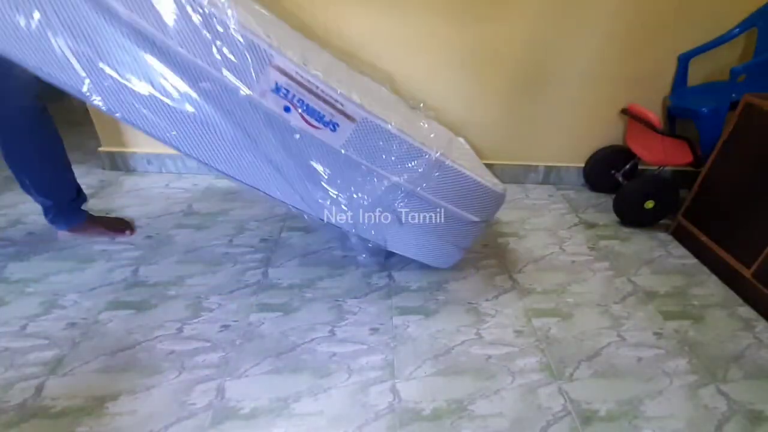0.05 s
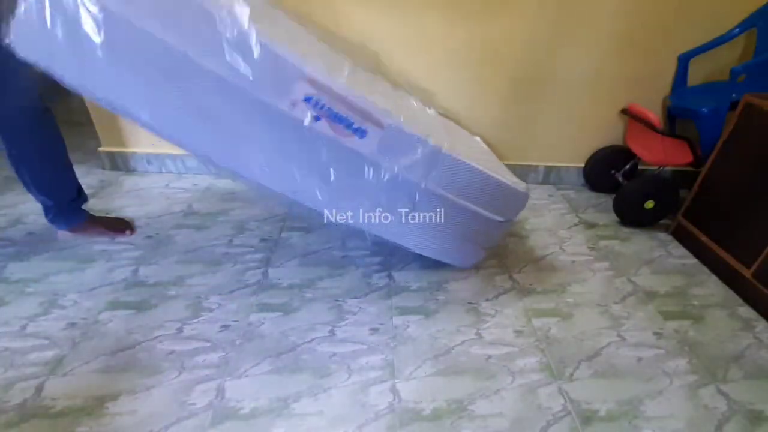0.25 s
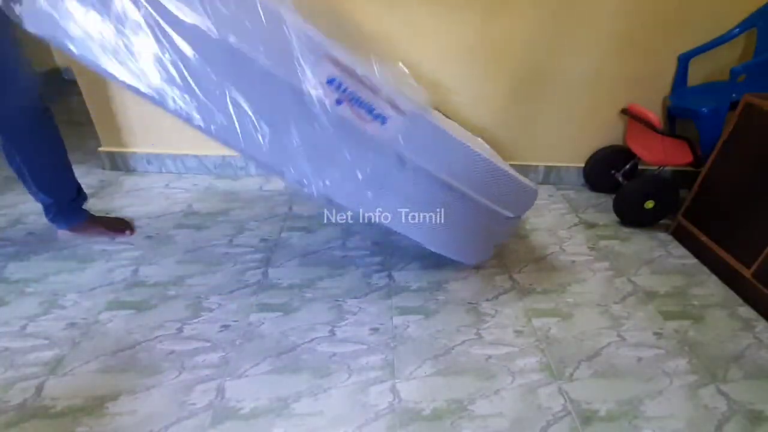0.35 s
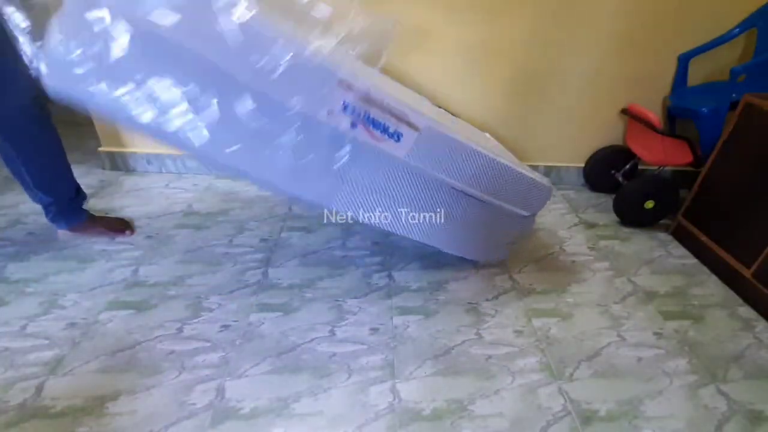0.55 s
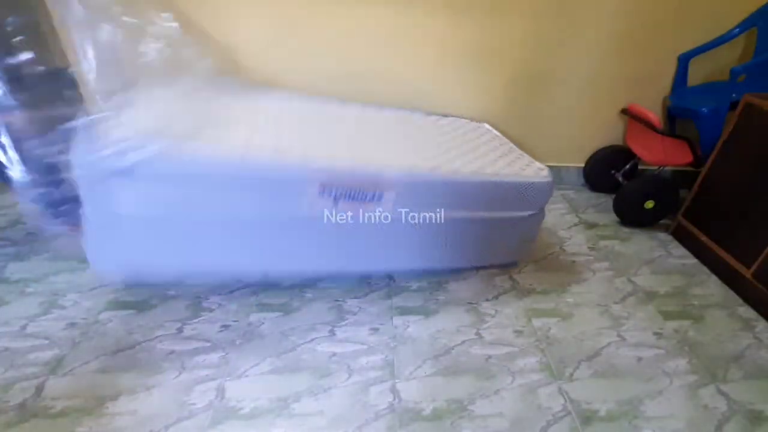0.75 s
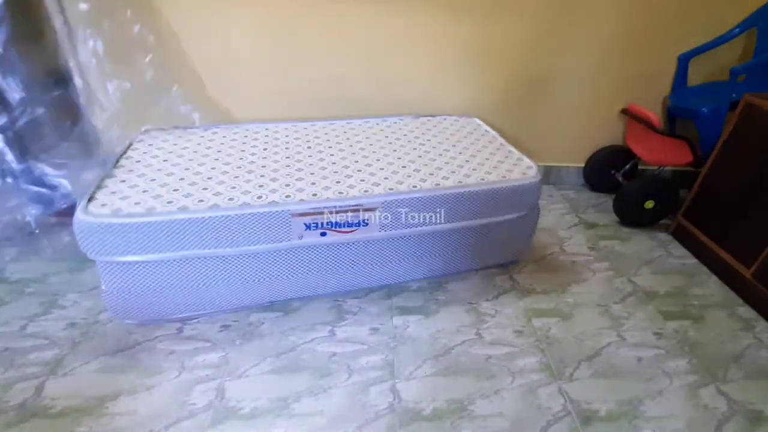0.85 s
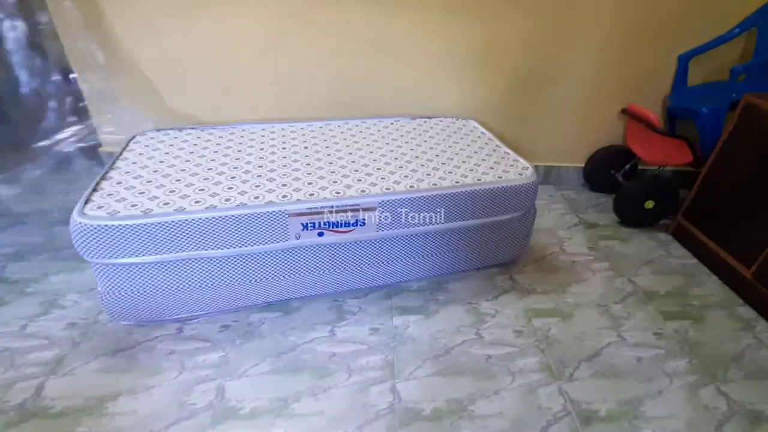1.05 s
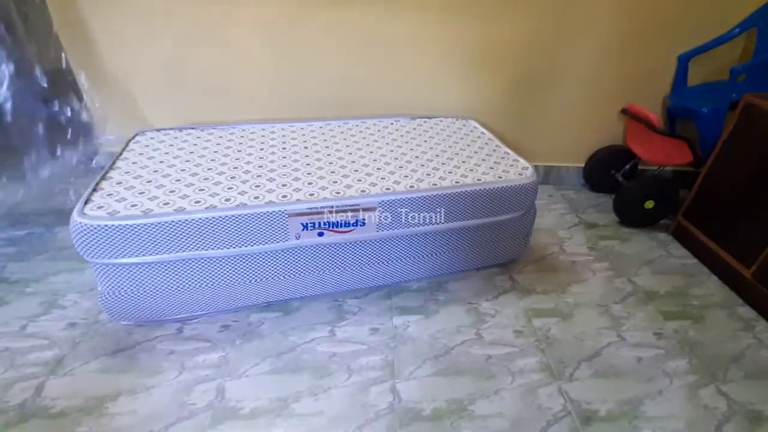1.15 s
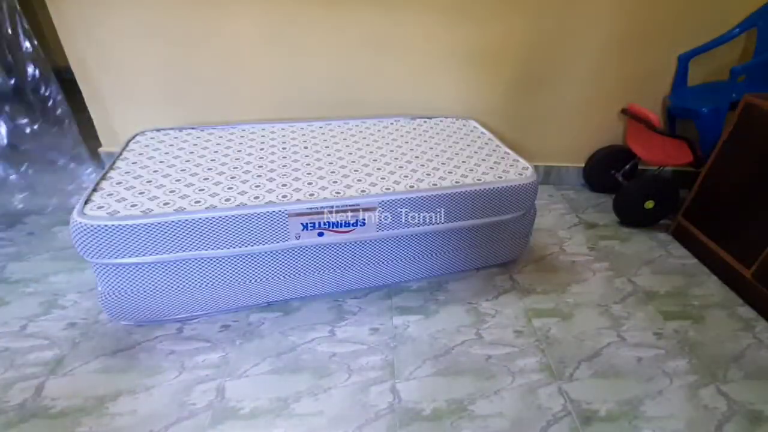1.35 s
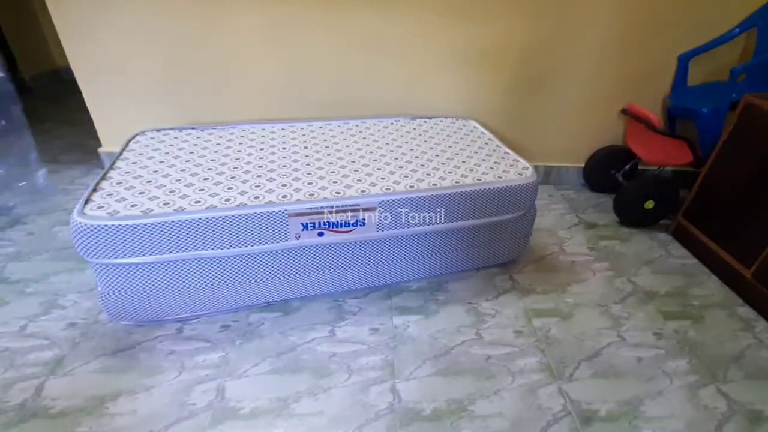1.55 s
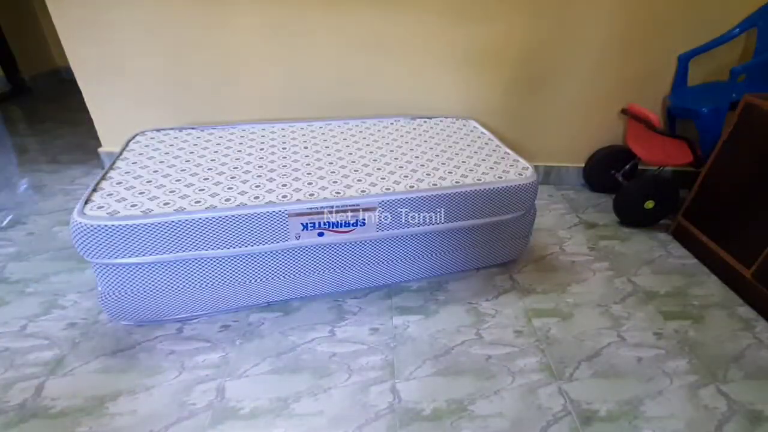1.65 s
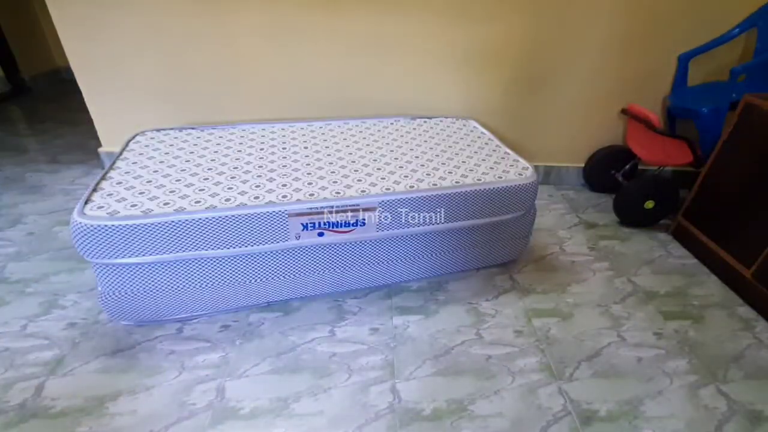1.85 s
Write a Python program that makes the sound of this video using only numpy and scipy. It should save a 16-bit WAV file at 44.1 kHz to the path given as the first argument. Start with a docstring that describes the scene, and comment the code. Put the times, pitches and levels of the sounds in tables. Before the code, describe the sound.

Thin plastic crinkles in uneven tugs from the start, with sharp little snaps, strongest around 0.3 to 0.4 seconds. At about 0.9 seconds a mattress slaps the tiled floor, the loudest moment, its low boom fading in the bare room over half a second. Lighter rustling continues until about 1.7 seconds. Soft microphone rumble and bumps come and go, mostly on the right, over faint background noise.

```python
"""Unwrapping a mattress

Thin plastic is dragged off a tilted mattress in a bare tiled room; its creases buckle and crackle.
The mattress topples and slaps the floor, and the air pulse flutters between floor and ceiling as a low
boom. A hand-held phone rumbles and bumps softly, mostly on the right, over faint background noise."""
import sys
import numpy as np
from scipy import signal
from scipy.fft import rfft, irfft
from scipy.io import wavfile

SR = 44100
rng = np.random.default_rng(int(sys.argv[2]) if len(sys.argv) > 2 else 0)


def int16_out(signal):
    """Quantize to a 16-bit WAV file."""
    q = np.round(np.clip(np.atleast_2d(signal).T, -1, 1) * 32767)
    wavfile.write(sys.argv[1], SR, q.astype(np.int16))


N = 83790
t = np.arange(N) / SR
FILM_T60_S, FILM_BUILD_S, IMPACT_BUILD_S = 0.44, 0.0021, 0.0066  # decay and onset of the reverberation


def undb(db):
    """Amplitude grows tenfold for every 20 dB."""
    return 10 ** (np.asarray(db) / 20)


def unit(x):
    """Normalisation to an rms of 1."""
    return x / np.sqrt(np.mean(x ** 2))


def pan(db):
    """Level difference, left minus right, as a pair of gains."""
    return undb(np.array([[db], [-db]]) / 2)


def decay(age, t60):
    """Exponential damping: 60 dB in t60 seconds."""
    return np.exp(-np.log(1000) * age / t60)


def convolve(x, response):
    """A linear system acts by convolution with its impulse response."""
    return signal.fftconvolve(np.atleast_2d(x), np.atleast_2d(response), axes=-1)[:, :N]


def colour(x, points, size=8192):
    """Minimum-phase filter through (Hz, dB) points."""
    hz, db = np.array(points).T
    bins_hz = np.maximum(np.fft.rfftfreq(size, 1 / SR), 1)
    cepstrum = irfft(np.log(undb(np.interp(np.log(bins_hz), np.log(hz), db))))
    cepstrum[1:size // 2] *= 2
    cepstrum[size // 2 + 1:] = 0
    return convolve(x, irfft(np.exp(rfft(cepstrum))))


def cut(x, hz, kind, order=2):
    """Maximally flat low-pass or high-pass."""
    return signal.sosfilt(signal.butter(order, hz, kind, fs=SR, output="sos"), x)


def zero_phase(x, hz, kind):
    """Filtering forwards, then backwards, cancels the phase shift."""
    forwards = cut(x, hz, kind, order=4)
    return cut(forwards[:, ::-1], hz, kind, order=4)[:, ::-1]


def delayed(x, seconds):
    """Propagation delay."""
    return np.interp(t - seconds, t, x, left=0)


def from_left(x, lag_s=0.00028):
    """Path difference: the sound reaches the right microphone later."""
    return np.array([x, delayed(x, lag_s)])


def diffuse(count, spacing_m=0.13):
    """A diffuse field at two microphones is coherent in the bass, incoherent in the treble."""
    coherence = 0.9 * np.sinc(2 * np.fft.rfftfreq(count, 1 / SR) * spacing_m / 343)
    spectra = rfft(rng.standard_normal((2, count)))
    mid, side = irfft(spectra * np.sqrt([1 + coherence, 1 - coherence]), count)
    return np.array([mid + side, mid - side]) / np.sqrt(2)


def room(x, t60, build_s):
    """Reverberation: diffuse reflections from bare walls build up, then decay."""
    age = t[:N // 2]
    tail = diffuse(len(age)) * decay(age, t60) * (1 - np.exp(-(age / build_s) ** 2))
    return convolve(x, tail / np.sqrt(np.sum(tail ** 2) / 2))


# Background spectrum: frequency_hz, gain_db
AIR_SPECTRUM = [(20,-41),(50,-5),(100,-1.5),(200,4),(400,0),(650,-10),(1100,-5),(2500,-22),(12000,-38)]
def room_air(level_db=-40.5):
    """The background of the house is a faint, steady diffuse field."""
    return undb(level_db) * unit(colour(diffuse(N), AIR_SPECTRUM))


# Tugs on the film: start_s, rise_s, hold_s, fade_db_per_s, level_db, treble_offset_db, low_offset_db
FILM_TUGS = [(-.06,0.04,0.056,76,-35.5,0.5,-1),(.12,0.019,.04,43,-41.5,1.5,1.5),(0.237,0.051,0.037,55,-39,1,0),(0.307,0.023,0.053,67,-33,3,-3.5),(0.416,0.045,0.034,76,-38.5,-10,3.5),(0.618,0.014,.04,62,-42,-2.5,1),(0.668,0.043,0.06,60,-39,-1,1),(0.736,.025,0.032,50.5,-35,1.5,-1),(0.867,0.031,0.022,147,-45.5,-9,12),(1.117,0.082,0.037,60,-39.5,1,-0.5),(1.31,0.044,0.054,53,-48.5,2,1.5),(1.427,.018,0.014,52,-40.5,3,-10.5),(1.563,.03,0.064,46,-44,2,-0.5)]
def tug_envelopes(rest_db=-62.5):
    """Incoherent tugs add in power, giving envelopes for the lows, body and treble."""
    power = undb(rest_db) ** 2
    for start, rise, hold, fade, db, treble_db, low_db in FILM_TUGS:
        swell = np.clip((t - start) / rise, 0, 1)
        tug = swell * undb(db - fade * np.maximum(t - start - rise - hold, 0))
        power = power + (tug * undb([[low_db], [0], [treble_db]])) ** 2
    return np.sqrt(power)


def jerks(rate_hz=35, depth_db=1.1):
    """Random amplitude modulation: the film gives way unevenly."""
    knots = rng.standard_normal(400)
    return undb(depth_db * np.interp(t * rate_hz, np.arange(len(knots)), knots))


# Crinkle spectrum: frequency_hz, gain_db
FILM_SPECTRUM = [(250,2.5),(450,7),(700,-1),(1100,3),(1800,-0.5),(3000,-2),(4500,-5.5),(6500,-12),(7900,-12.5),(8600,-17.5),(11000,-14),(15500,-17)]
# Hollow resonances in the rustle: pitch_hz, bandwidth_hz, gain_db
FILM_RESONANCES = [(1522,33,1.5),(2036,69,-1)]
def crinkle(creases_per_s=2600, spread_db=3.5, direct_db=-3.5, gain_db=5.5):
    """Buckling creases radiate dense tiny clicks, louder the harder the film is pulled."""
    sizes = undb(spread_db * np.minimum(rng.exponential(size=N), 3.6))
    clicks = (rng.random(N) < creases_per_s / SR) * sizes * rng.choice([-1, 1], N)
    # Creases lie all over the sheet: each takes a random lag and one of three paths round the room.
    right = np.bincount((np.arange(N) + rng.integers(0, 20, N)) % N, clicks, N)
    path = rng.integers(0, 3, N)
    echoes = sum(room(clicks * (path == k), FILM_T60_S, FILM_BUILD_S) for k in range(3))
    rustle = undb(direct_db) * pan(1) * np.array([clicks, right]) + echoes
    ringing = sum(undb(db) * signal.lfilter(*signal.iirpeak(hz, hz / width, SR), rustle)
                  for hz, width, db in FILM_RESONANCES)
    rustle = unit(colour(rustle + ringing, FILM_SPECTRUM))
    lows, treble = zero_phase(rustle, 1500, "low"), zero_phase(rustle, 6550, "high")
    body = rustle - lows - treble
    low_gain, body_gain, treble_gain = tug_envelopes()
    return (lows * low_gain + body * body_gain + treble * treble_gain) * jerks() * undb(gain_db)


# Strength of the grip's rumble: time_s, level_db
GRIP_LEVELS = [(0,-36.5),(.2,-31),(.35,-25.5),(.45,-28.5),(.65,-27),(.72,-33.5),(1.1,-39),(1.38,-33),(1.45,-38),(1.54,-28.5),(1.68,-31.5),(1.9,-33)]
# Rumble spectrum: frequency_hz, gain_db
RUMBLE_SPECTRUM = [(20,-41),(40,-9),(60,2),(110,-1.5),(170,-7.5),(290,-13),(450,-23.5),(700,-34.5),(2000,-57.5)]
# Finger bumps: start_s, level_db, pitch_hz, left_minus_right_db
FINGER_BUMPS = [(.137,-30.5,166,-22),(0.244,-22.5,110,-15.5),(0.323,-26,65.4,-15),(.352,-16,93,13),(0.631,-23.5,173,-16),(.717,-23.5,166,-17),(1.281,-24,148,-20.5),(1.375,-30,125,0),(1.526,-24.5,125,-22),(1.543,-24,127,-17),(1.635,-20.5,124,-12.5)]
def handling(rubs_per_s=260, left_db=-6.5, crosstalk_db=-16, rumble_gain_db=4, bump_s=0.0028):
    """Structure-borne sound: the grip slips in tiny dull rubs and fingers bump the phone."""
    rubs = (rng.random((2, N)) < rubs_per_s / SR) * rng.uniform(0.38, 1, (2, N))
    rubs *= rng.choice([-1, 1], (2, N))
    left, right = unit(colour(rubs, RUMBLE_SPECTRUM))
    grip = undb(np.interp(t, *np.array(GRIP_LEVELS).T) + rumble_gain_db)
    out = np.array([undb(left_db) * left + undb(crosstalk_db) * right, right]) * grip
    for start, db, hz, pan_db in FINGER_BUMPS:
        age = np.maximum(t - start, 0)
        envelope = age / bump_s * np.exp(1 - age / bump_s)
        out += pan(pan_db) * undb(db) * envelope * np.sin(2 * np.pi * hz * age)
    return out


# Single snaps of the film: start_s, level_db, highpass_hz
CREASE_SNAPS = [(0.042,-25,2000),(.066,-21,2000),(0.147,-16.5,1500),(0.1864,-12,5040),(0.323,-9,3000),(.377,-3.5,1500),(0.577,-19,3000),(0.633,-17,1500),(0.885,-7.5,6000),(1.183,-14,2020)]
# Snap spectrum: frequency_hz, gain_db
SNAP_SPECTRUM = [(500,-27),(2000,-10.5),(6000,6.5),(8500,-4),(11000,0.5),(15500,-3.5)]
def snaps(decay_s=0.00087, gain_db=-13.5, room_db=-2.5):
    """Snap-through: each large crease lets go with one sharp crack."""
    noise, out = rng.standard_normal((2, N)), 0
    for start, db, highpass_hz in CREASE_SNAPS:
        crack = noise * (t >= start) * np.exp(-np.abs(t - start) / decay_s)
        out = out + undb(db + gain_db) * cut(crack + 1e-18, highpass_hz, "high")
    out = colour(out, SNAP_SPECTRUM)
    return out * pan(1.5) + undb(room_db) * room(out, FILM_T60_S, FILM_BUILD_S)


# Short pings in the hardest tug: start_s, pitch_hz, level_db
TUG_PINGS = [(.316,2075,-32),(.333,1515,-28),(.362,2060,-31),(.385,1515,-31)]
def pings(t60_s=0.077):
    """Damped sinusoids ring briefly near two pitches."""
    out = 0
    for start, hz, db in TUG_PINGS:
        age = np.maximum(t - start, 0)
        out = out + undb(db) * np.sin(2 * np.pi * hz * age) * decay(age, t60_s)
    return out


# The mattress lands edge first, then flat, then settles: time_s, level_db, pulse_width_s
FLOOR_CONTACTS = [(0.8833,-19.5,0.00143),(0.8886,-0.5,0.0012),(0.955,-18,0.00074),(0.9738,-15.5,0.0022),(0.9875,-31,0.00071)]
def slap(squeeze_s=0.00079, squeeze_share=0.82, gain_db=1):
    """Air is compressed under the falling mattress until contact; a rarefaction follows."""
    out = np.zeros(N)
    for time, db, width in FLOOR_CONTACTS:
        contact = time - width
        compression = (t < contact) * np.exp(-np.abs(t - contact) / squeeze_s)
        rarefaction = np.exp(-((t - time) / width) ** 2)
        out += undb(db + gain_db) * (squeeze_share * compression - rarefaction)
    return cut(cut(out, 63.5, "high"), 1700, "low")


def flutter(pulse, round_trip_s=0.0168, cutoff_hz=497, gain_db=-4):
    """Flutter echo: a pulse and its reflections between floor and ceiling, duller each trip."""
    filter_lag_s = 1 / (2 * np.pi * cutoff_hz)
    reflection = decay(round_trip_s, t60=0.44)
    out, echo = pulse, undb(gain_db) * pulse
    for _ in range(40):
        echo = reflection * cut(delayed(echo, round_trip_s - filter_lag_s), cutoff_hz, "low", order=1)
        out = out + echo
    return out


# Room modes: pitch_hz, level_db, t60_s, build_s
STANDING_WAVES = [(58.14,-10.5,1,0.047),(175,-19,0.35,0.004),(206,-21,0.96,0.011),(245.4,-32,0.77,0.0074),(303,-46,0.31,0.0067),(416,-26,0.49,0.0044),(474,-55,0.22,.01)]
# Spectrum of the slap's reverberation: frequency_hz, gain_db
BOOM_SPECTRUM = [(40,-17),(100,-6.5),(190,3),(320,-0.5),(450,0),(620,-19),(1300,-13),(2500,-3)]
def boom(room_t60_s=0.59, room_db=-1.5):
    """The slap flutters and reverberates; its hardest contact excites the room's standing waves."""
    pulse, modes = slap(), 0
    hardest_s = max(FLOOR_CONTACTS, key=lambda row: row[1])[0]
    age = np.maximum(t - hardest_s, 0)
    for hz, db, t60, build in STANDING_WAVES:
        envelope = decay(age, t60) * (1 - np.exp(-(age / build) ** 2))
        modes = modes - undb(db) * envelope * np.cos(2 * np.pi * hz * age)
    reverberation = colour(room(pulse, room_t60_s, IMPACT_BUILD_S), BOOM_SPECTRUM)
    return from_left(flutter(pulse) + modes) + undb(room_db) * reverberation


# Spectrum of cloth striking tile: frequency_hz, gain_db
SMACK_SPECTRUM = [(200,2),(600,0.5),(1100,0),(1500,-3.5),(2000,-3),(4000,-37),(12000,-30)]
def cover_smack(start_s=0.8874, gain_db=12, room_db=2, room_t60_s=0.41):
    """Impact of the cloth cover on the tiles: one dull crack that the walls reflect."""
    impulse = np.zeros(N)
    impulse[int(start_s * SR)] = undb(gain_db)
    crack = colour(impulse, SMACK_SPECTRUM)[0]
    return from_left(crack) + undb(room_db) * room(crack, room_t60_s, IMPACT_BUILD_S)


def scene():
    """Superposition of film, mattress, hand and background."""
    return crinkle() + snaps() + pings() + boom() + cover_smack() + handling() + room_air()


def record(dry):
    """Band limiting: the phone passes 24 Hz to 15.6 kHz."""
    lowpass = signal.ellip(10, 0.2, 80, 15600, fs=SR, output="sos")
    return signal.sosfilt(lowpass, cut(dry, 24, "high"))


dry = scene()
out = record(dry)
int16_out(out)
```